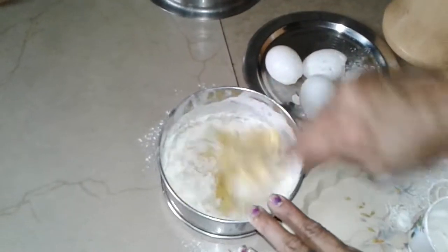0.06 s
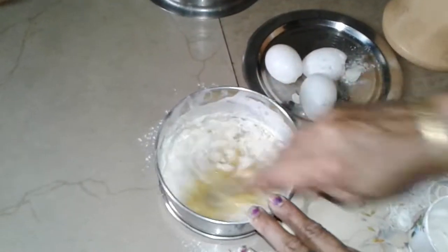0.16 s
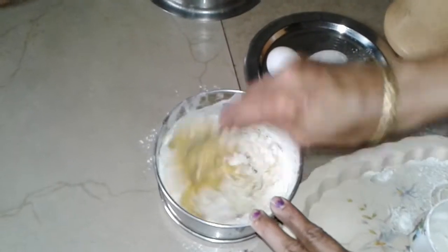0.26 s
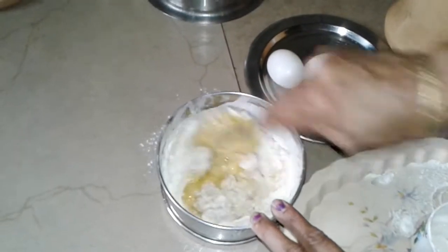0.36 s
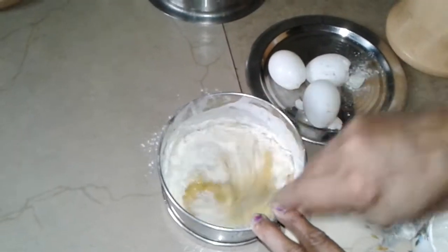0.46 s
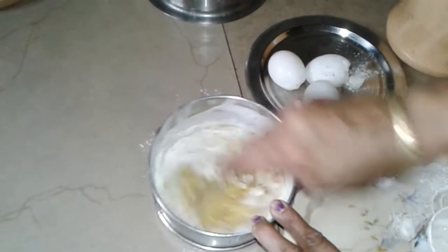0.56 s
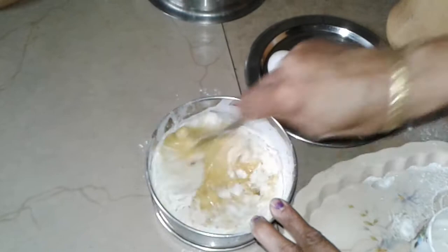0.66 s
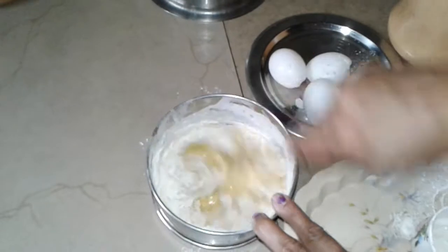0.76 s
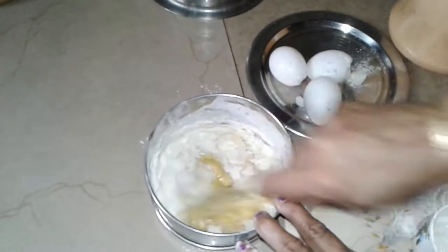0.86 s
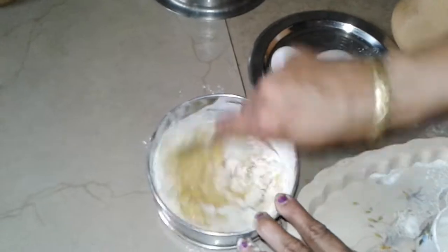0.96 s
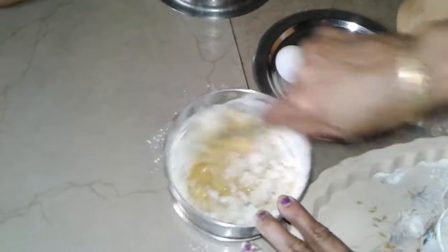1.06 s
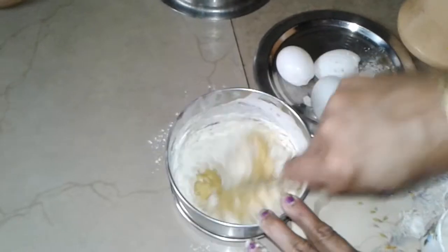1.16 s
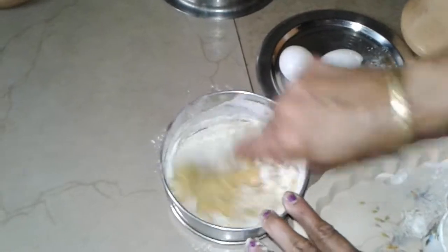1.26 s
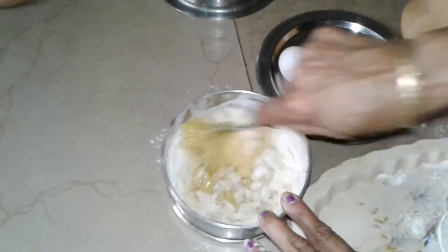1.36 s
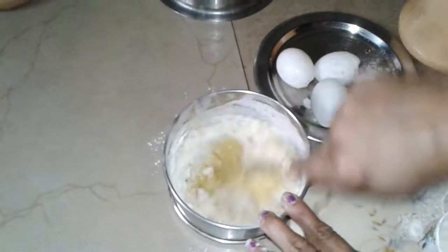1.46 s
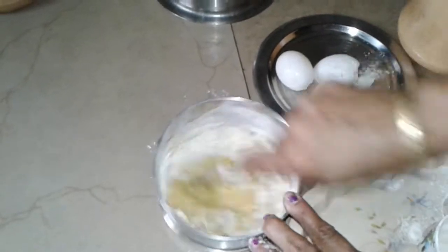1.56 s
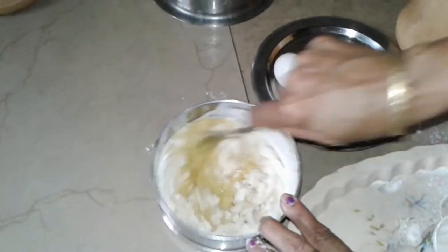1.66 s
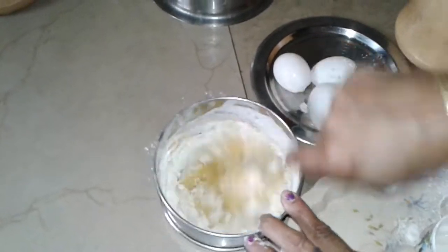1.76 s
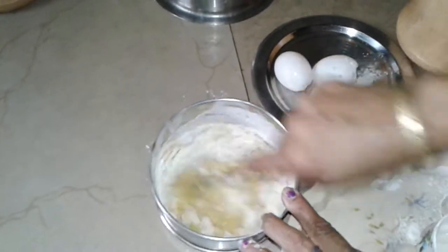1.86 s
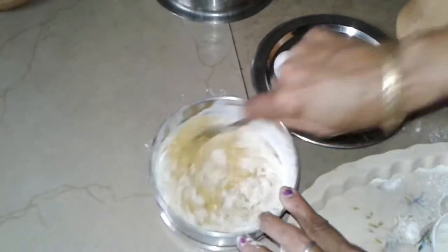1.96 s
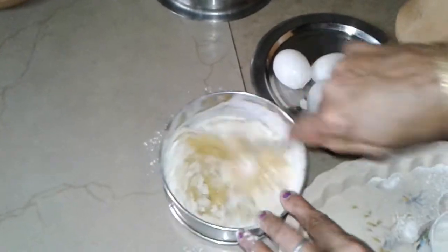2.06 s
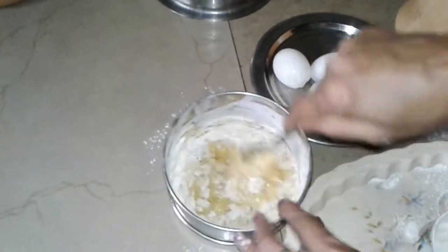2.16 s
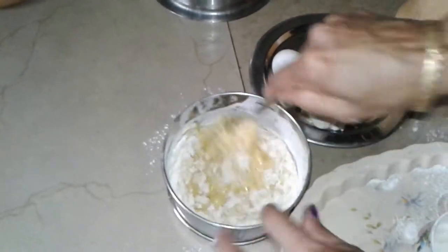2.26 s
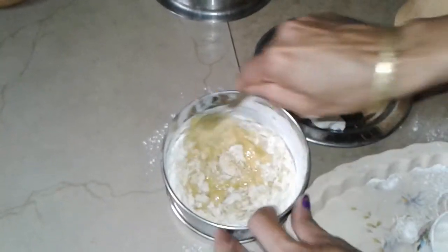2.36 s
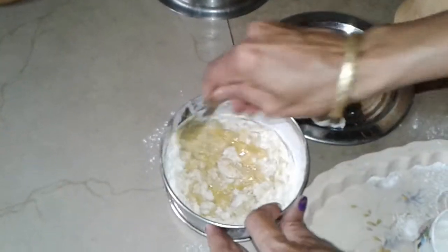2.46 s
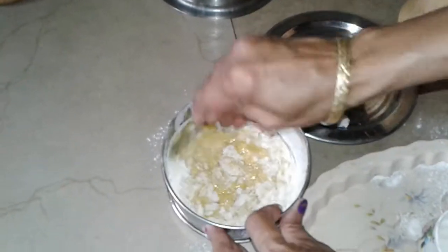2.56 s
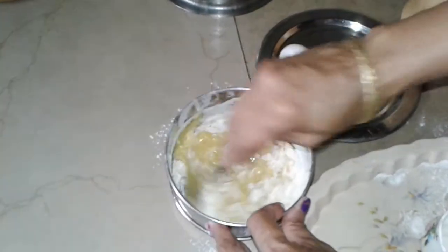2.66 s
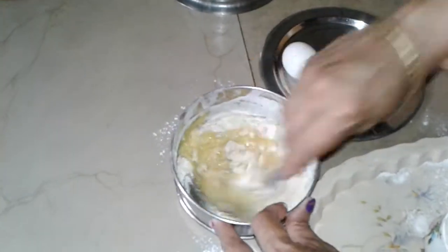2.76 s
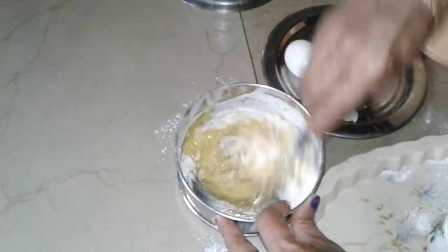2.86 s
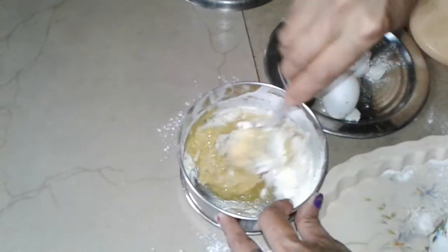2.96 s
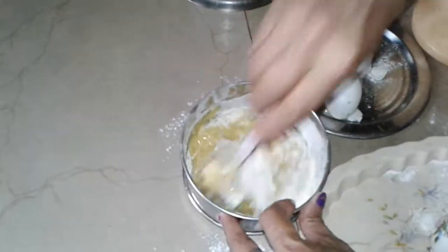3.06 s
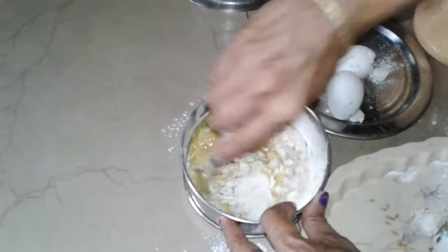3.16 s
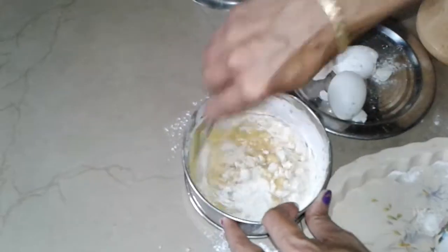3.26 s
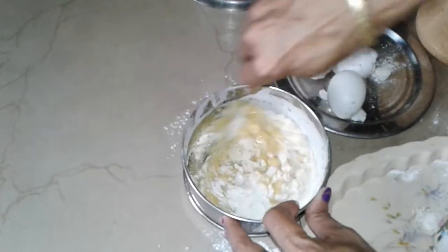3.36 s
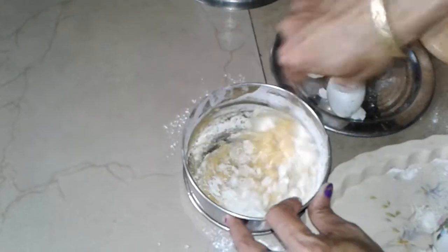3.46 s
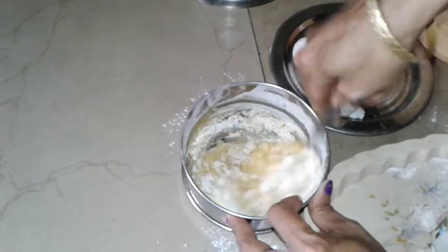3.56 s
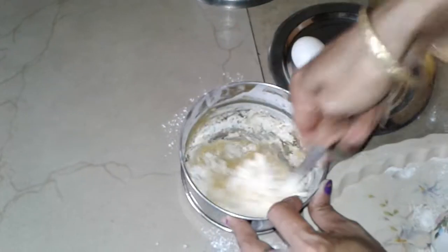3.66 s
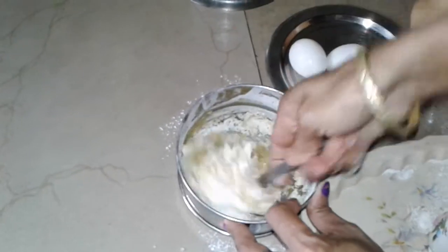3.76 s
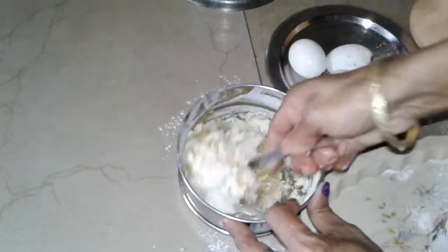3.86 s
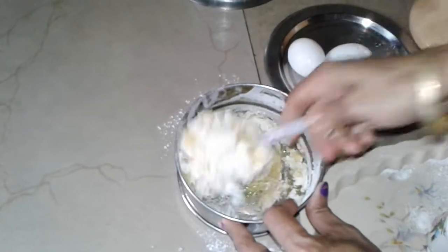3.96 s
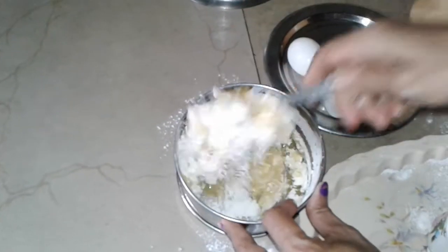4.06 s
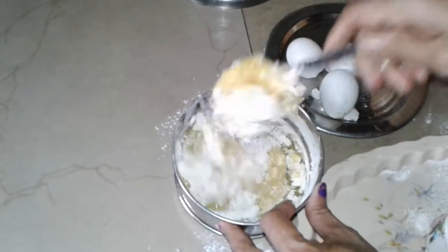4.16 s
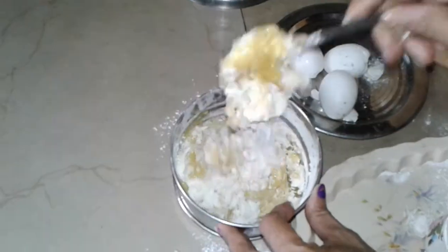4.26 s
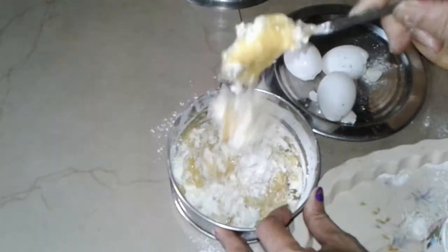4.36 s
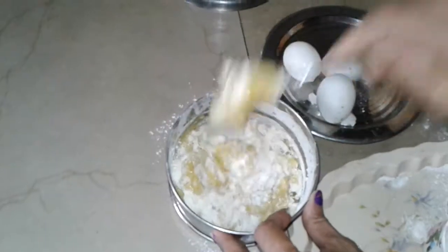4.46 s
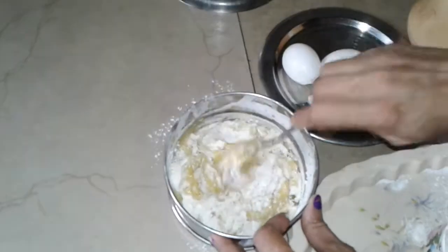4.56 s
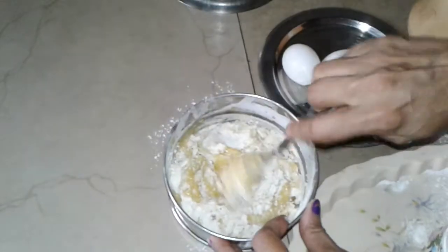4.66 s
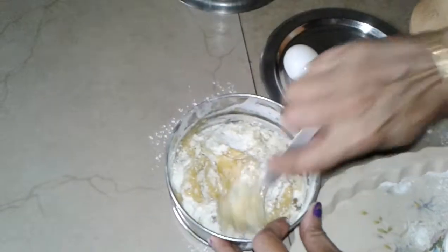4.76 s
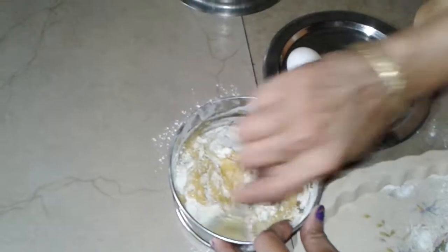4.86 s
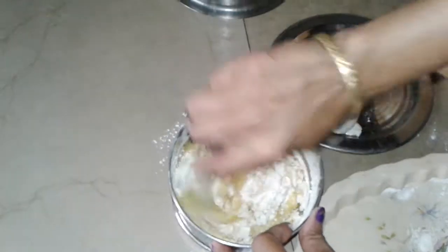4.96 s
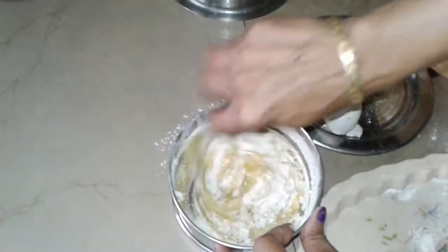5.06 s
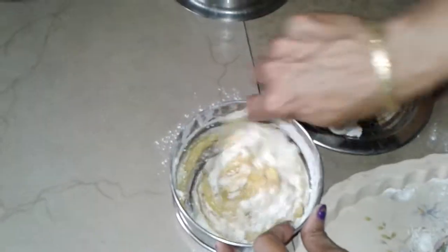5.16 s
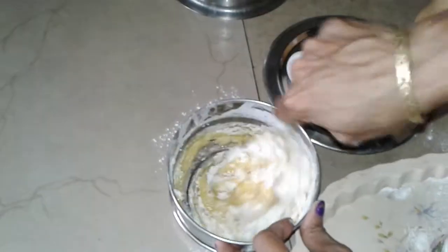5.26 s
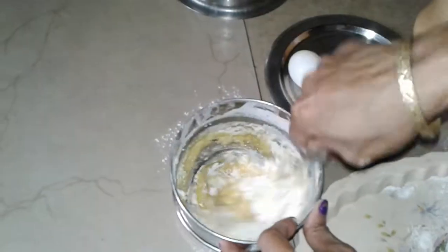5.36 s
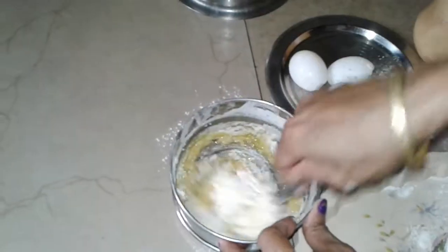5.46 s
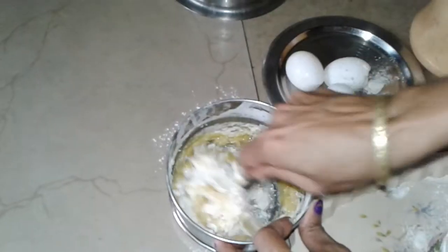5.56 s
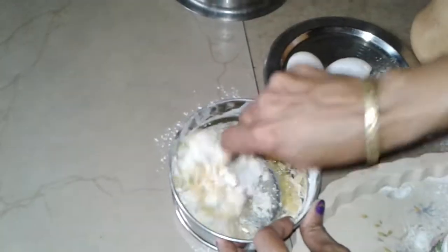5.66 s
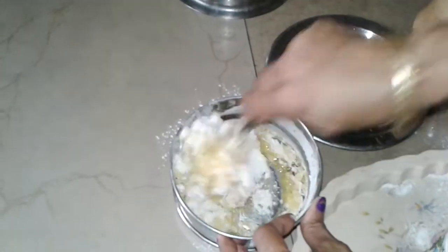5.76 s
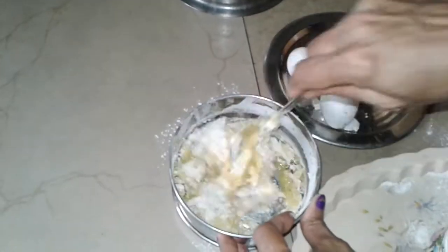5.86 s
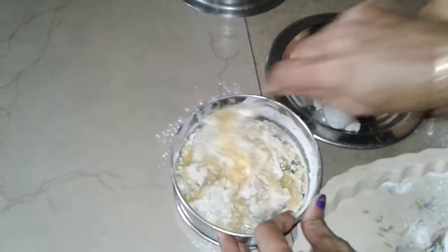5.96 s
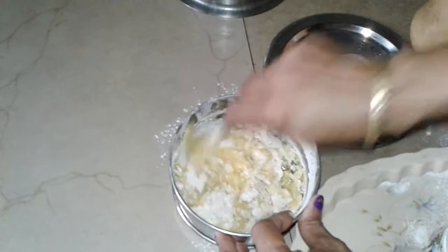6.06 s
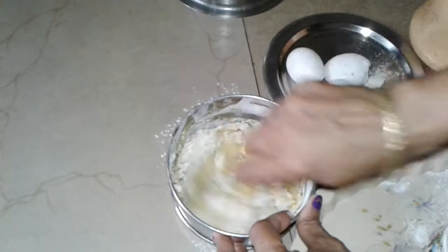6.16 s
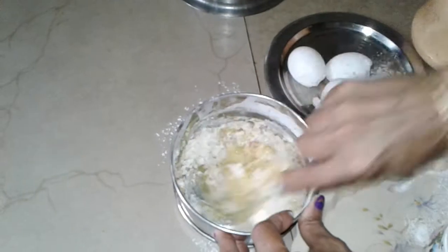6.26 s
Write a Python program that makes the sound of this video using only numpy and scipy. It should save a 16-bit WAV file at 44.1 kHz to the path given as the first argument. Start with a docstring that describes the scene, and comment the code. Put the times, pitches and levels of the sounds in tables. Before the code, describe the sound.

Close, rapid scraping and ticking of a spoon mixing batter in a steel bowl, in spells with short pauses, in an echoing kitchen.

```python
"""Beating batter in a steel bowl

A metal spoon beats thick batter, close by. It grates over sugar and steel in strokes, ticks on the
wall of the bowl and knocks the bowl against a stone counter. Each contact makes the steel or stone
ring. A hard kitchen echoes, and a far bird sings short falling phrases over the hum of the house."""
import sys
import numpy as np
from scipy import signal
from scipy.fft import rfft, irfft, next_fast_len
from scipy.io import wavfile
from scipy.ndimage import uniform_filter1d, map_coordinates

SR = 44100
rng = np.random.default_rng(int(sys.argv[2]) if len(sys.argv) > 2 else 0)


def put_to_file(sound):
    """Save the sound as 16-bit audio at rate SR, in the file named by the first command-line argument."""
    columns = np.atleast_2d(sound).T  # one column per channel
    safe = np.clip(columns, -1, 1)
    whole_steps = np.round(safe * 32767)
    wavfile.write(sys.argv[1], SR, whole_steps.astype(np.int16))


N = 277830

# A mode is a pitch at which a thing likes to ring; the narrower it is, the longer it rings.
# Columns of all six tables: f/Hz, width/Hz, level/dB
RIM_MODES = [(9454.2, 849.8, -0.5), (11661, 2292, -3.5), (14009, 3036.6, -3.5)]  # the highest ringing of the bowl's rim
TIP_MODES = [(7358.7, 779.5, -6), (8024.9, 277.8, 2), (8554.5, 676.4, -7.5)]  # the spoon tip and the small hollow in the microphone
BOWL_MODES = [(853.51, 38.3, -9), (982.12, 171.7, 2.5), (1186.1, 289.67, -2), (2132.8, 609.3, -8)]  # the low ringing of the bowl
FOOT_MODES = [(461.11, 50.65, -1.5), (601.27, 49.985, -2), (773.29, 151.17, -7)]  # the foot of the bowl
COUNTER_MODES = [(243.25, 12.05, -3), (307.96, 14.236, 6), (376.52, 32.48, -2.5)]  # the stone counter
CUPBOARD_MODES = [(119, 3.086, 0.5), (174, 22.2, -7.5), (213.32, 12.65, -0.5)]  # the hollow under the counter


def amp(db):
    """Turn decibels into a number to multiply by."""
    return 10 ** (np.asarray(db) / 20)


def unit(x):
    """Scale a sound to an average power of 1."""
    return x / np.sqrt(np.mean(x ** 2) + 1e-20)


def along(points, hz):
    """Read a curve of (f/Hz, value) points at hz, with octaves evenly spaced."""
    freqs, values = np.transpose(points)
    return np.interp(np.log(hz + 1), np.log(freqs + 1), values)


def curves(rows):
    """Turn rows of (t/s, values...) into one curve per value, sample by sample."""
    times, *columns = np.transpose(rows)
    return [np.interp(np.arange(N) / SR, times, column) for column in columns]


def wobble(rate):
    """A smooth random curve through `rate` points a second."""
    points = rng.standard_normal(int(N * rate / SR) + 4)
    return map_coordinates(points, [np.arange(N) * rate / SR])


def filtered(x, response):
    """Multiply each frequency in x by response(frequency)."""
    size = next_fast_len(x.shape[-1] + SR // 2)
    hz = np.fft.rfftfreq(size, 1 / SR)
    return irfft(rfft(x, size) * response(hz), size)[..., :x.shape[-1]]


def ring(x, modes):
    """Shake an object with x so its modes ring; flipping every other one avoids gaps between them."""
    def response(f):
        return sum((-1) ** k * amp(db) * 1j * f * width / (hz * hz - f * f + 1j * f * width)
                   for k, (hz, width, db) in enumerate(modes))
    return filtered(x, response)


def bright(x, modes):
    """Ring high modes and let little through below them."""
    return ring(ring(x, modes), [(10235, 5146, 0.00015)])


def strokes():
    """Each stroke of the spoon swells and fades; the loudest sets the treble and the contact point."""
    # t/s of the peak, 20 dB rise/s, 20 dB fall/s, level/dB, treble/dB and hum/dB (both relative to
    # that level), f/Hz where the wall rings best
    spoon_strokes = [(0.0, .05, 0.0707, -53.5, -8, -5.5, 4513), (0.117, 0.029, 0.219, -50, -7.5, -6, 3290),
                     (0.17, 0.0344, 0.1167, -38.5, -2.5, -15, 4100),
                     (.36, 0.5497, 0.9832, -57.5, -5.5, -7, 3695),
                     (.485, 0.0625, 0.2427, -49, -2.5, -11.5, 3420),
                     (.52, 0.0585, 0.1224, -38.5, -2.5, -24, 4158),
                     (.655, -0.0526, 0.2611, -50, -8, -13, 3435),
                     (0.714, -0.006, 0.0667, -45, -4.5, -21.5, 3603),
                     (0.839, 0.0777, 0.037, -40, -3.5, -23, 3625),
                     (.91, 0.7467, 0.0002, -59.5, -5.5, -3, 3307),
                     (.968, 0.1471, 0.2346, -48, -4, -10, 3453),
                     (1.028, 0.0349, 0.0348, -40, -2, -28.5, 4631),
                     (1.176, 0.0771, 0.1567, -41.5, -8.5, -14.5, 3519),
                     (1.205, 0.0257, 0.0432, -33, 2.5, -24, 4093),
                     (1.255, 0.0958, 0.1636, -44, -4.5, -12.5, 3252),
                     (1.36, 0.1229, 0.2399, -46, -3, -6.5, 4568),
                     (1.48, 0.1094, 0.0816, -41.5, -10.5, -16.5, 3598),
                     (1.538, -0.2125, 0.0538, -42.5, -4, -14, 3617),
                     (1.584, -0.027, 0.2438, -45, -2.5, -10.5, 3538),
                     (1.675, -0.2935, 0.1283, -42, -2.5, -18, 4105),
                     (1.846, 0.0886, 0.0843, -34, -4, -19, 3587),
                     (1.948, 0.1179, 0.1876, -40, -5.5, -25, 4015),
                     (2.04, 0.24, 0.1414, -44.5, -10.5, -3, 3688),
                     (2.123, -0.0266, 0.0596, -39.5, -3.5, -19.5, 3462),
                     (2.18, 0.2215, 0.1193, -48.5, -5, -5.5, 4220),
                     (2.67, 0.9484, -0.164, -69.5, -2.5, 3, 4620),
                     (2.762, 0.0472, 0.1583, -56.5, -2.5, -9.5, 3658),
                     (2.82, 0.333, 0.2095, -60, 1.5, -5, 3660),
                     (2.889, 0.0194, 0.0608, -43, -4.5, -12.5, 4051),
                     (3.27, 0.1045, 0.3745, -62.5, -3.5, -11, 2875),
                     (3.371, 0.0607, 0.4115, -51, -5, -17.5, 3864),
                     (3.435, 0.0293, 0.2529, -49.5, -5, -6.5, 3766),
                     (3.51, 0.0934, 0.3161, -51, -4, -8, 4190), (3.58, 0.0031, 0.067, -36, -7.5, -12, 3520),
                     (3.66, 0.0911, 0.179, -43.5, -4, -11.5, 3611),
                     (3.765, 0.0522, 0.071, -40.5, -10.5, -5, 3681),
                     (3.815, 0.1235, 0.0481, -47.5, 2, -1, 4382), (3.864, 0.0231, 0.0004, -32, 0, -1, 2858),
                     (3.9, 0.0651, 0.0388, -54.5, 2, 6.5, 2600), (3.955, 0.0754, 0.0466, -51, -2, 3, 3437),
                     (4.03, 0.3417, 0.1595, -65.5, -2.5, 3.5, 2963),
                     (4.9, 0.7678, 3.09, -70.5, -7.5, -7.5, 3080),
                     (5.027, -0.0154, 0.0708, -54, -6.5, -3, 4354),
                     (5.065, -0.0339, 0.1312, -50, 1, -12, 4693),
                     (5.135, 0.0022, -0.0413, -52, 3, -5.5, 5104),
                     (5.235, 0.0758, 0.457, -56.5, -4, -5, 2881),
                     (5.305, 0.0142, 0.1178, -54, -5, -2.5, 3395),
                     (5.343, 0.0214, 0.1438, -38.5, -7.5, -17, 3044),
                     (5.415, 0.0652, 0.0816, -41, -5.5, -21.5, 4464),
                     (5.49, 0.0819, 0.1661, -44, -1.5, -20.5, 4176),
                     (5.565, 0.0608, 0.0738, -50, -7, -2.5, 3400),
                     (5.64, 0.0634, 0.3, -58.5, -10.5, -6, 3383),
                     (6.183, 0.1152, -1.2547, -57, -7.5, -12, 2942),
                     (6.24, -0.0066, 0.0237, -47, 3, -14.5, 4462)]
    peak_s, rise_s, fall_s, db, treble_db, hum_db, hz = np.transpose(spoon_strokes)[:, :, None]
    t = np.arange(0, N / SR + .001, .001)
    from_peak = np.where(t < peak_s, (peak_s - t) / abs(rise_s), (t - peak_s) / abs(fall_s))
    fade_db = 20 * from_peak ** 1.1249  # a power over 1 gives round tops and abrupt ends
    power = amp(db - fade_db) ** 2 + 1e-12
    hum_power = amp(db + hum_db - fade_db / 1.055) ** 2 + 1e-12  # swells and fades a little slower
    total = power.sum(0)
    tip_db = (power * treble_db).sum(0) / total
    best_hz = (power * hz).sum(0) / total
    return np.transpose([t, 10 * np.log10(total), tip_db, 10 * np.log10(hum_power.sum(0)), best_hz])


def grit(scatter_db, clump_db):
    """A crowd of tiny impacts of uneven size that come in clumps."""
    sizes = amp(scatter_db * rng.standard_normal(N) + clump_db * (wobble(60) + wobble(350)))
    return unit(sizes * rng.standard_normal(N))


def bowl_wall(x, best_hz, focus_db):
    """As the spoon moves along the wall, the modes near best_hz take most of the shaking."""
    # the steel wall, damped by batter: f/Hz, width/Hz, level/dB
    wall_modes = [(2030.3, 583, -3.5), (2600.7, 152.85, -1), (3203.7, 569.5, -2.5), (4289.2, 905.5, -2),
                  (4732.2, 922.5, -2), (5487.9, 481.2, -1.5), (6076.9, 712.5, -3)]
    hz, width, db = np.transpose(wall_modes)
    drift_db = 2.2 * np.array([wobble(30) for _ in wall_modes])
    octaves_away = np.log2(hz[:, None] / best_hz)
    share = amp(drift_db - focus_db * octaves_away ** 2)
    strength = amp(db) * np.sqrt(width)
    share *= np.linalg.norm(strength) / np.sqrt(strength ** 2 @ share ** 2)  # keep the total power
    ringing = sum((-1) ** k * ring(x * share[k], [mode]) for k, mode in enumerate(wall_modes))
    return ring(ringing, [(4425.7, 7201, 0)])  # the small wall gives off little below its modes


def scraping():
    """Grit under the spoon shakes wall, tip and rim; the dragging makes bowl and counter hum."""
    # the bowl dragging on the counter: t/s, level/dB
    drag_levels = [(0.0, -62.5), (0.44, -65.5), (0.63, -64.5), (1.19, -63), (1.44, -60), (1.74, -58.5),
                   (2.4, -61), (2.6, -63.5), (2.96, -69.5), (3.16, -73), (3.26, -67), (3.4, -61),
                   (3.6, -63.5), (3.93, -55.5), (4.07, -71.5), (4.25, -71.5), (4.53, -79), (4.77, -71),
                   (5.11, -64), (5.25, -63), (5.47, -65), (5.77, -72.5), (6.07, -70.5), (6.3, -64.5)]
    scrape_db, tip_db, hum_db, best_hz = curves(strokes())
    drag_db, = curves(drag_levels)
    swell_db = scrape_db - uniform_filter1d(scrape_db, size=SR // 3)
    drag_db += 0.2593 * swell_db  # the counter takes up part of each stroke's swell
    grains = grit(scatter_db=2.5, clump_db=2.0)
    drag = grit(scatter_db=3.5, clump_db=2.0)
    rim = amp(tip_db - 1.5) * unit(bright(grains, RIM_MODES))
    tip = amp(tip_db) * unit(bright(grains, TIP_MODES))
    wall = unit(bowl_wall(grains, best_hz, focus_db=7.5))
    bowl = amp(hum_db) * unit(ring(drag, BOWL_MODES + [(1462, 160, -5.0)]))
    counter = amp(drag_db) * unit(ring(drag, CUPBOARD_MODES[1:] + COUNTER_MODES + FOOT_MODES))
    return amp(scrape_db) * (wall + rim - tip) + bowl + counter  # minus: no gap between tip and rim


def house_hum():
    """The house makes a steady, mostly low noise that wavers a little."""
    # the tone of the noise: f/Hz, relative level/dB
    spectrum = [(12, 3.5), (32, -13), (48, -13.5), (68, 2.5), (158, -4), (386, -9.5), (750, -17),
                (1690, -15), (3040, -23), (6600, -31.5), (8050, -14), (9100, -30), (10100, -14),
                (11500, -35.5), (15800, -29.5)]
    noise = filtered(rng.standard_normal(N), lambda hz: amp(along(spectrum, hz)))
    return amp(-63 + 0.2705 * wobble(3.1776)) * unit(noise)


def spoon_ticks():
    """Each tap of the spoon is a sharp little burst of noise that rings wall, tip and rim."""
    # spoon tip on the wall: t/s, level/dB, treble/dB relative to it, f/Hz where the wall rings best
    taps = [(.0398, -41.5, -10, 4620), (.111, -38.5, -18, 3200), (.162, -21, -9.5, 6105),
            (.353, -29, -16.5, 3744), (.428, -39, -10, 3804), (.478, -33, -27, 3298),
            (.508, -14.5, -13, 3689), (.648, -33, -15, 3544), (.693, -24.5, -14.5, 3761),
            (.7208, -30, -4.5, 3120), (.8135, -26, -16, 3219), (.9045, -29, -13.5, 3062),
            (.9614, -28.5, -12.5, 3221), (1.014, -18, -21, 4527), (1.037, -24, -10.5, 4902),
            (1.147, -29.5, -20, 4855), (1.1638, -27, -19.5, 3107), (1.195, -13, -26, 5363),
            (1.2005, -11, -20.5, 3402), (1.338, -24, -7.5, 3862), (1.3623, -21.5, -12, 4750),
            (1.4237, -30.5, -26, 3795), (1.4421, -21.5, -22.5, 4305), (1.4805, -20.5, -15.5, 3228),
            (1.534, -20, -18, 3303), (1.558, -24.5, -27.5, 2182), (1.655, -12.5, -24, 4305),
            (1.678, -22.5, -21.5, 4260), (1.7908, -24.5, -15.5, 5070), (1.8088, -22, -6, 3258),
            (1.8406, -10, -11.5, 3433), (1.8487, -14, -11, 6340), (2.0315, -18, -20.5, 3811),
            (2.067, -20, -21.5, 3803), (2.099, -19, -14, 5083), (2.127, -22, -16.5, 3185),
            (2.167, -10, -16, 4006), (2.356, -49, -4.5, 3248), (2.55, -44.5, -9, 5107),
            (2.661, -43.5, -13, 2507), (2.6956, -33, -17, 4653), (2.702, -34, -18.5, 4632),
            (2.757, -41.5, -1.5, 3512), (2.813, -30.5, -4.5, 3735), (2.8868, -18, -20, 4004),
            (3.2221, -43.5, -9, 3722), (3.265, -21.5, -13.5, 1993), (3.367, -27.5, -15.5, 4600),
            (3.424, -25, -9.5, 2072), (3.525, -36.5, -7.5, 3310), (3.5558, -27.5, -27.5, 3326),
            (3.585, -13.5, -26, 3430), (3.6431, -23, -16.5, 5994), (3.691, -31.5, -19, 6160),
            (3.796, -27.5, -2.5, 6190), (3.857, -22, -5, 3910), (3.9345, -36, -15.5, 2090),
            (3.951, -22, -14, 3738), (4.121, -51.5, -15.5, 4300), (4.301, -50.5, -15, 4691),
            (4.3231, -49, 3, 6497), (4.646, -48.5, -3, 2112), (4.98, -42, -16.5, 2018),
            (5.0245, -33, -22, 3469), (5.057, -25.5, -13.5, 4391), (5.135, -31.5, -8, 5480),
            (5.2165, -26.5, -13.5, 2706), (5.304, -33, -16, 5340), (5.334, -28, -15.5, 3168),
            (5.3502, -18.5, -34, 3093), (5.41, -22, -13, 5840), (5.476, -26.5, -15, 4403),
            (5.57, -26, -12, 2247), (5.6336, -55, -19, 3800), (5.68, -28, -21.5, 2331),
            (6.1805, -37.5, -6, 2323), (6.2256, -23.5, -13.5, 4470)]
    # small extra taps come at random and are louder when the scraping is louder
    count, per_second = 400, 40
    times, scrape_db = strokes().T[:2]
    starts = rng.random(count) * count / per_second
    above_scrape_db = 6 + 3.5 * rng.standard_normal(count)
    small_taps = [(start, np.interp(start, times, scrape_db) + db, -16.5)
                  for start, db in zip(starts, above_scrape_db) if start < N / SR]
    rise_s, fall_s = 0.0004551, 0.009069
    t = np.arange(SR // 20) / SR
    shape = amp(-26 * t / fall_s) * (1 - np.exp(-t / rise_s))
    drive = np.zeros((2, N + SR))
    best_hz = np.full(N, taps[0][3], float)
    for start, db, treble_db, *hz in taps + small_taps:
        at = round(start * SR)
        burst = shape * rng.standard_normal(len(t))
        burst *= np.linalg.norm(shape) / np.linalg.norm(burst)
        drive[:, at:at + len(t)] += amp([[db], [db + treble_db]]) * burst
        if hz:  # small taps leave the contact point where it is
            best_hz[at:] = hz[0]
    wall_drive, treble_drive = drive[:, :N]
    rim = bright(amp(5.5) * treble_drive, RIM_MODES)
    tip = bright(amp(13.5) * treble_drive, TIP_MODES)
    return bowl_wall(wall_drive, best_hz, focus_db=46.5) + rim - tip


def bowl_knocks():
    """A blunt blow and a rattle shake the counter, the hollow under it, and the bowl and its foot."""
    # bowl against counter: t/s, push on counter/dB, on foot/dB, on cupboard/dB, on bowl/dB,
    # contact time/ms, rattle time/s
    knocks = [(0.543, -38.5, -49.5, -42.5, -55, 0.298, 0.0929),
              (0.907, -38, -41.5, -50.5, -47.5, 0.299, 0.25686),
              (1.88, -56.5, -65.5, -50, -41, 0.2276, 0.1658),
              (2.07, -52.5, -42, -56.5, -43.5, 0.2105, 0.1285),
              (2.1675, -29, -26.5, -30, -37, 0.1502, 0.19615),
              (2.416, -29.5, -36, -28, -45, 0.2665, 0.12555),
              (2.884, -75, -50.5, -55, -45.5, 0.4168, 0.1236),
              (3.224, -49.5, -52, -49.5, -59, 0.2934, 0.1473),
              (3.264, -31, -44.5, -32.5, -49, 0.3643, 0.1822),
              (3.8637, -32.5, -36, -40.5, -24.5, 0.07155, 0.1365),
              (3.9349, -37.5, -35, -59, -35, 0.13336, 0.104),
              (3.949, -43.5, -40.5, -47, -41.5, 0.1575, 0.1287),
              (4.496, -69.5, -69, -72, -65.5, 0.2013, 0.0589),
              (4.645, -55, -63.5, -59.5, -57, 0.2424, 0.0513),
              (5.562, -48.5, -44, -46.5, -39.5, 0.1965, 0.0533),
              (5.569, -42.5, -38.5, -51.5, -35.5, 0.1891, 0.18),
              (6.134, -62, -72.5, -67.5, -59, 0.203, 0.0434),
              (6.182, -31.5, -28, -52.5, -43.5, 0.5092, 0.09795)]
    parts = [(COUNTER_MODES, 2.12), (FOOT_MODES, 4.703), (CUPBOARD_MODES, 4.635), (BOWL_MODES, 5.531)]
    drive = np.zeros((4, N + SR))
    t = np.arange(SR // 5) / SR
    for start, *levels_db, contact_ms, rattle_s in knocks:
        contact = 1000 * t / contact_ms  # the blow is hardest when this reaches 1
        blow = contact * np.exp(1 - contact) / contact_ms
        rattle = 9.105 * rattle_s * amp(-60 * t / rattle_s) * rng.standard_normal(len(t))
        drive[:, round(start * SR):][:, :len(t)] += amp(levels_db)[:, None] * (blow + rattle)
    return sum(amp(db) * ring(push[:N], modes) for push, (modes, db) in zip(drive, parts))


def bird():
    """A bird whistles short, husky notes that slide onto their last pitch, mostly downward."""
    # t/s, length/s, first f/Hz, last f/Hz, level/dB
    notes = [(1.085, 0.0564, 2300, 1970, -61.5), (2.997, 0.0781, 3200, 3000, -75.5),
             (3.062, 0.0634, 2726, 2373, -69.5), (3.15, 0.04555, 1857, 1768, -72),
             (4.093, 0.0321, 2112, 1963, -66), (4.385, 0.038, 3378, 2994, -71),
             (4.446, 0.03154, 3072, 3001, -69.5), (4.47, 0.064, 2700, 2260, -72),
             (4.562, 0.06566, 1769, 1687, -73.5), (4.836, 0.05133, 3290, 2918, -72),
             (4.898, 0.02843, 3040, 3000, -74), (5.691, 0.04957, 3317, 3024, -55),
             (5.736, 0.06954, 2802, 2779, -59), (5.752, 0.0991, 2407, 2149, -69),
             (5.84, 0.07874, 1899, 1785, -69.5), (6.12, 0.03944, 3460, 3419, -65),
             (6.2, 0.07256, 2392, 2375, -58), (2.994, 0.02927, 4309, 4888, -68.5),
             (3.191, 0.03662, 4300, 4835, -70), (5.65, 0.048, 4000, 3180, -62),
             (5.696, 0.1503, 3250, 1801, -62), (5.77, 0.092, 3500, 2408, -63)]
    song = np.zeros(N + SR)
    for start, length, first_hz, last_hz, db in notes:
        progress = np.linspace(0, 1, round(length * SR))
        hz = last_hz + (first_hz - last_hz) * (1 - progress) ** 1.8
        swell = np.sin(np.pi * progress) ** 0.465
        whistle = np.sin(2 * np.pi * np.cumsum(hz) / SR)
        song[round(start * SR):][:len(whistle)] += amp(db) * swell * whistle
    return song[:N] * (1 + .55 * wobble(300))  # a fast flutter in level sounds husky


def kitchen_echo(x, stretch):
    """Each frequency of the echo dies at its own speed; every third of a second gets a new tail."""
    # f/Hz, time/s to fade by 60 dB before it is multiplied by stretch
    fade_times = [(100, 0.9027), (500, 0.3653), (2000, 0.3267), (8000, 0.16593), (15000, 0.28846)]
    echo = np.zeros(N + 2 * SR)
    step, delay_samples = SR // 3, 150
    for start in range(0, N, step):
        hz, t, noise = signal.stft(rng.standard_normal(int(SR * .7)), SR, nperseg=256)
        fade_s = stretch * along(fade_times, hz)[:, None]
        tail = signal.istft(noise * amp(-60 * t / fade_s), SR, nperseg=256)[1]
        piece = signal.fftconvolve(x[start:start + step], tail / np.linalg.norm(tail))
        echo[start + delay_samples:][:len(piece)] += piece
    return echo[:N]


def scene():
    """The near bowl with some echo, the far bird with much more, and the house; both channels alike."""
    near = scraping() + spoon_ticks() + bowl_knocks()
    song = bird()
    far = song + kitchen_echo(song, stretch=2.823)
    mono = near + amp(-8.0) * kitchen_echo(near, stretch=0.938) + far + house_hum()
    return np.array([mono, mono])


def record(dry):
    """Cut away the very highest treble."""
    top_hz = 15850
    return filtered(dry, lambda hz: hz < top_hz)


dry = scene()
out = record(dry)
put_to_file(out)
```